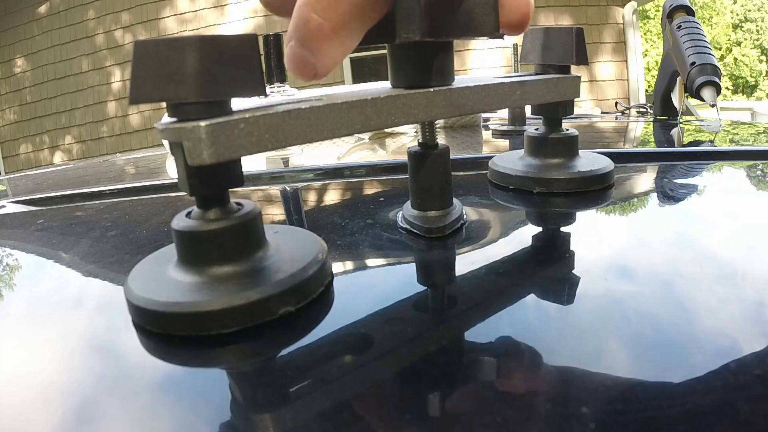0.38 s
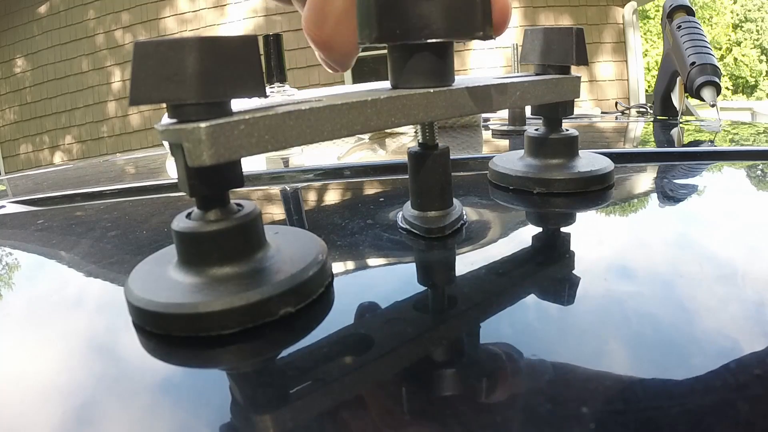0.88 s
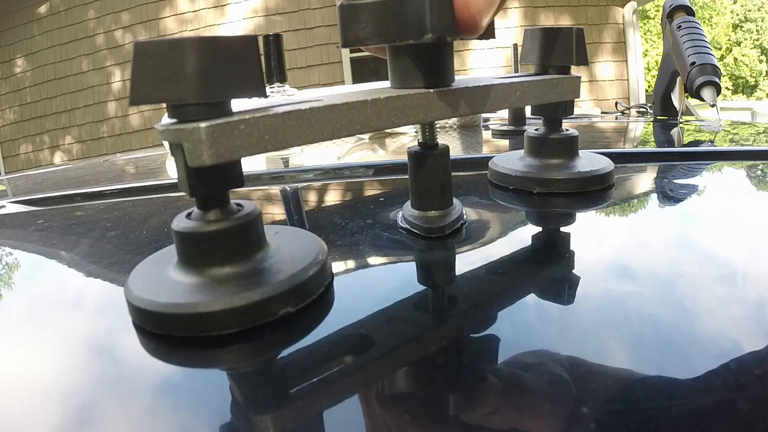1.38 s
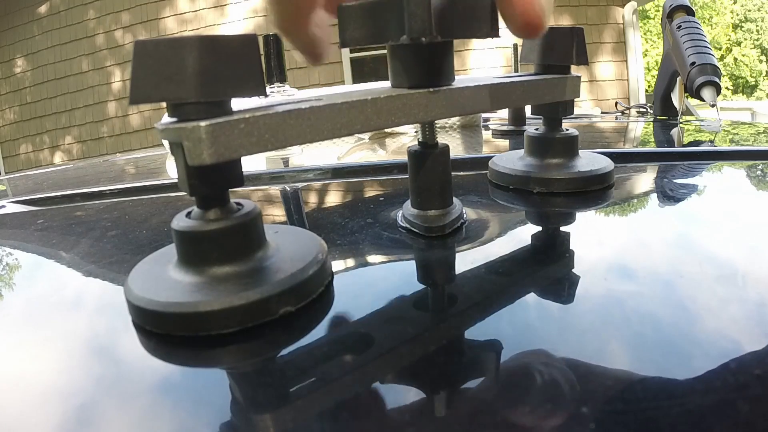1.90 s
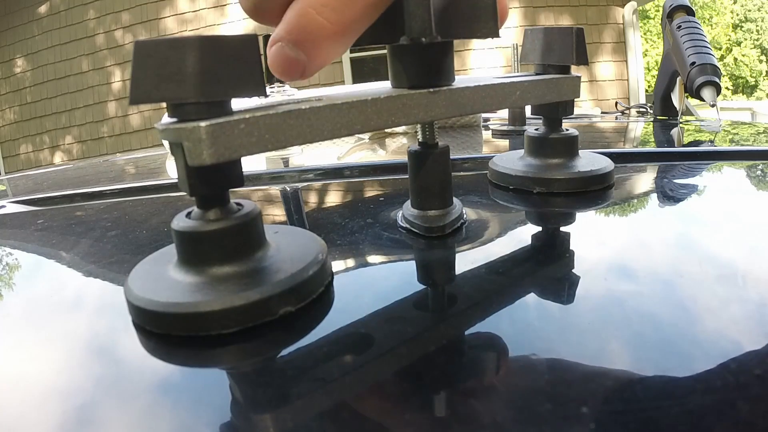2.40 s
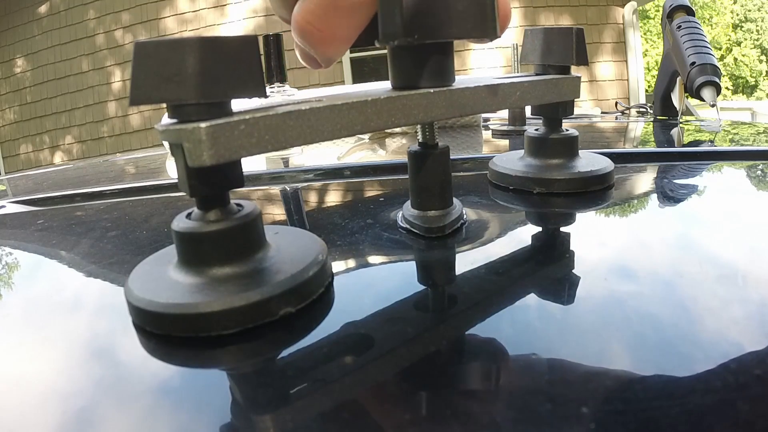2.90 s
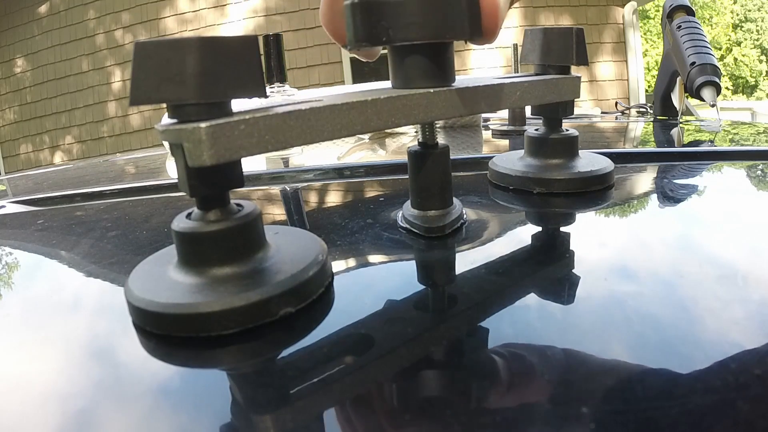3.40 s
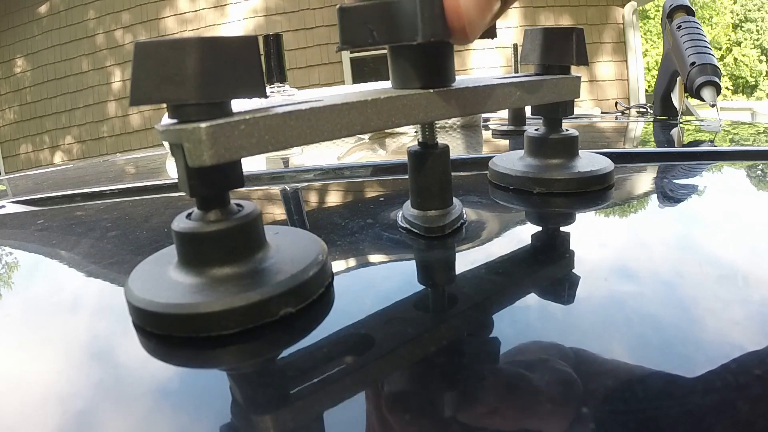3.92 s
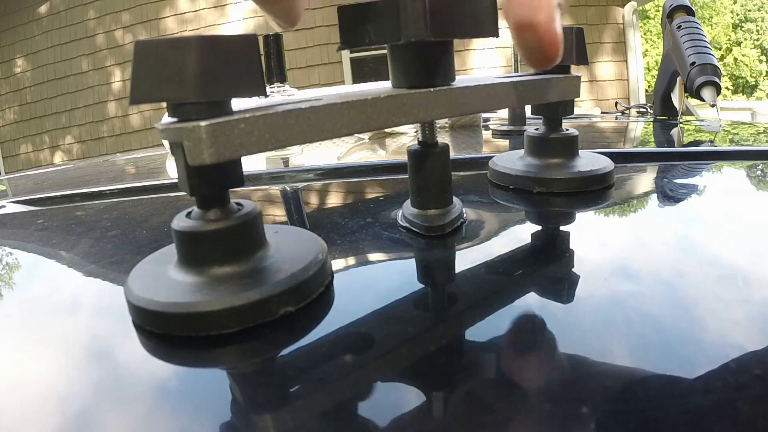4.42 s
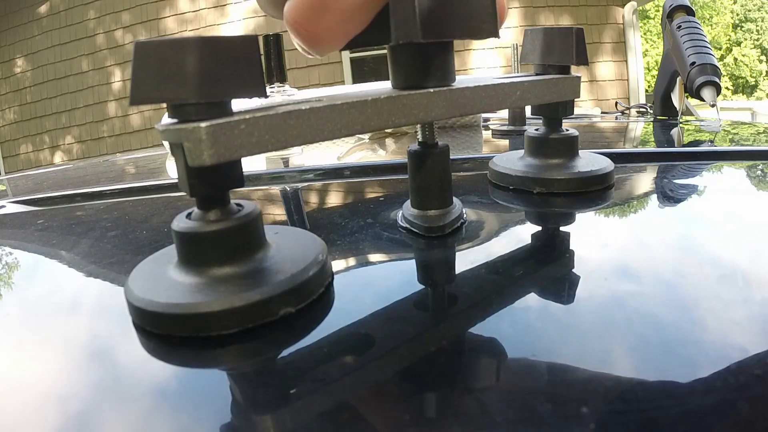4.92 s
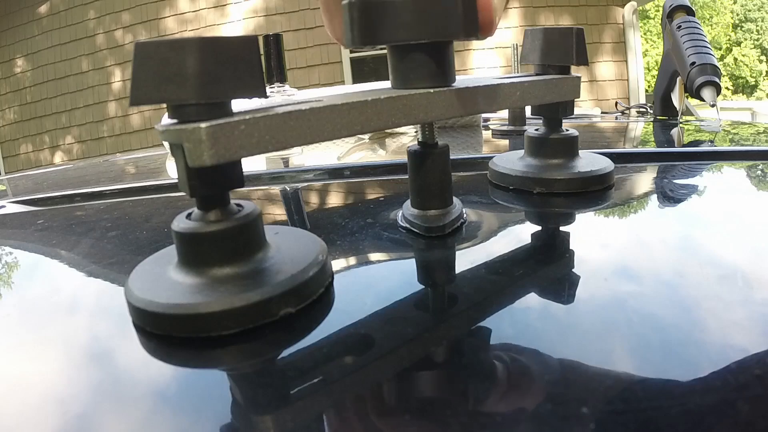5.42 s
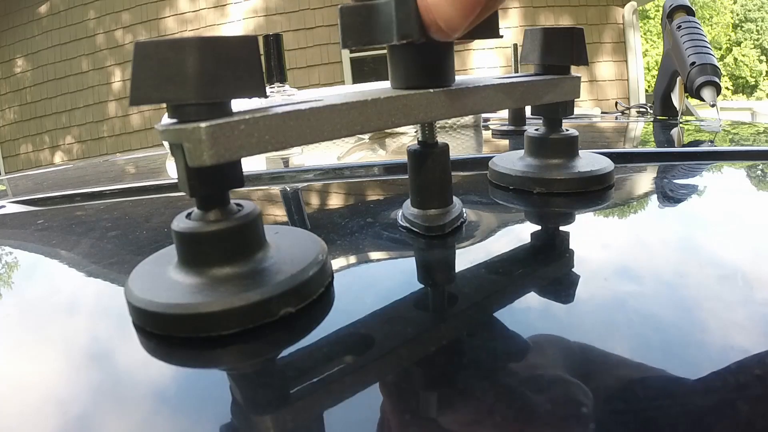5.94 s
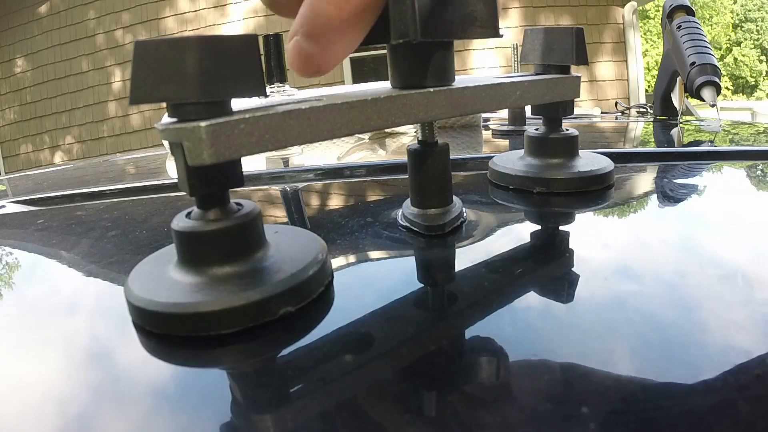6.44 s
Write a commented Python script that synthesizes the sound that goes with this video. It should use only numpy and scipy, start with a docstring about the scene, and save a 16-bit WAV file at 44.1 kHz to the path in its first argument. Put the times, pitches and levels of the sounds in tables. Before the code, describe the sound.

Three rising bird whistles open the scene, then another bird gives quick chips and a thin, squeaky wheeze. After a short lull the first bird returns with livelier warbles and slurs, and faint whistles come from farther away. Near the stereo microphone, a hand twisting a knob makes irregular light rubbing, clicks and soft hollow bumps on sheet metal. Steady traffic rumble and soft hiss lie underneath.

```python
"""A songbird carols from trees across a yard: gliding sines with soft ends and fluttering level. A second bird
answers with short falling chips and a thin wheeze; faint whistles sound far off. House walls and leaves smear
the notes into tails, made by convolution with decaying noise. Close by, fingers turn a plastic knob on a metal
panel: scuffs of friction noise, ringing ticks and thuds. Far traffic rumbles and drones and the microphone
hisses, all as coloured noise."""
import sys
import numpy as np
from scipy import signal
from scipy.fft import rfft, irfft
from scipy.io import wavfile
from scipy.ndimage import uniform_filter1d

SR = 44100
rng = np.random.default_rng(int(sys.argv[2]) if len(sys.argv) > 2 else 0)


def ratio_of_db(decibels):
    """Turn decibels (scalar or array-like) into linear amplitude factors; 0 dB maps to 1."""
    return 10 ** (np.asarray(decibels, float) / 20)


def output_pcm(signal):
    """Save a mono or channel-first signal as 16-bit PCM at the path in sys.argv[1].

    Samples are clipped to [-1, 1] before scaling.
    """
    pcm = np.clip(np.atleast_2d(signal).T, -1, 1) * 32767
    wavfile.write(sys.argv[1], SR, np.round(pcm).astype(np.int16))


N = 289296

# Loudness contour of a held note or far whistle: share_of_length, relative_db
HOLD_CONTOUR = [(0, -4.5), (.3, -0.5), (1, -8.5)]


def rms_one(x):
    """Normalization: a signal divided by its root mean square has unit power."""
    return x / np.sqrt(np.mean(x ** 2) + 1e-20)


def at_hz(points, hz):
    """Logarithmic frequency scale: a spectrum table is interpolated along log frequency."""
    columns = np.array(points)
    return np.interp(np.log(hz), np.log(columns[:, 0]), columns[:, 1])


def drift(rate_hz):
    """Low-pass filtered noise: two equal poles leave slow random motion with spread 1."""
    hop = 40    # samples between computed values
    pole = np.exp(-2 * np.pi * rate_hz * hop / SR)
    draws = rng.standard_normal(N // hop + 2002)
    slow = signal.lfilter([1], [1, -2 * pole, pole * pole], draws)[2000:]   # skip the build-up
    return np.interp(np.arange(N) / hop, np.arange(len(slow)), rms_one(slow))


def ring(clicks, hz, t60_s):
    """Damped resonance: a two-pole filter answers each unit click with a decaying sine of initial height 1."""
    radius = ratio_of_db(-60 / (t60_s * SR))
    angle = 2 * np.pi * hz / SR
    feedback = [1, -2 * radius * np.cos(angle), radius * radius]
    return signal.lfilter([0, np.sin(angle)], feedback, clicks + 1e-18)


def pan(x, left_db):
    """Interaural level difference: left minus right level places a sound."""
    return x * ratio_of_db(np.array([[left_db / 2], [-left_db / 2]]))


def stereo_noise(spectrum, flicker_db):
    """Spatial coherence: coloured noise is alike in the bass and unrelated in the treble."""
    # Left-right correlation: frequency_hz, correlation (0-1)
    likeness = [(100, .99), (300, .98), (700, 0.92), (1400, 0.78), (3000, 0.22), (6000, 0.17), (12000, 0)]
    # Left minus right level: frequency_hz, difference_db
    balance = [(100, -3), (700, -2.0), (1400, -1.5), (4000, 0.6), (10000, 1.3)]
    hz = np.maximum(np.fft.rfftfreq(N, 1 / SR), 1)
    mid, side = rfft(rng.standard_normal((2, N))) * ratio_of_db(at_hz(spectrum, hz))
    alike = np.clip(at_hz(likeness, hz), 0, 1)
    lean = ratio_of_db(at_hz(balance, hz) / 2)
    mid = np.sqrt(1 + alike) * mid
    side = np.sqrt(1 - alike) * side
    out = irfft(np.array([(mid + side) * lean, (mid - side) / lean]), N)
    steady = out / np.std(out.mean(axis=0))     # mid rms 1
    return steady * ratio_of_db(flicker_db * drift(8.3))


def background():
    """Superposition of independent noises: traffic rumble and drone add to a hiss without swells."""
    # Traffic swells: time_s, rumble_db, drone_db
    traffic = [(0.0, -35.5, -45), (1.5, -37, -46), (2.229, -36.5, -44.5), (2.6, -37, -45.5),
               (3.9, -39, -45.5), (4.3, -36.5, -46.5), (6.16, -37, -45.5), (6.3, -35.5, -43.5),
               (6.56, -33.5, -43)]
    # Spectral shapes, scaled to unit power in use: frequency_hz, relative_db_per_hz
    rumble_colour = [(11, -43), (18, -0.5), (64, 1), (209, -9), (285, -16.5), (361, -11.5), (400, -17),
                     (520, -44.5), (880, -120)]
    drone_colour = [(120, -24), (200, -1), (286, -5.5), (363, -4), (524, -11), (857, -15.5), (2000, -28),
                    (2600, -42), (4400, -120)]
    hiss_colour = [(880, -9), (1500, -13), (1870, -21.5), (2230, -5), (2320, -7), (3190, -6.5), (3650, -8),
                   (15100, -14)]
    time_s, rumble_db, drone_db = np.transpose(traffic)
    t = np.arange(N) / SR
    rumble = ratio_of_db(np.interp(t, time_s, rumble_db)) * stereo_noise(rumble_colour, flicker_db=1.23)
    drone = ratio_of_db(np.interp(t, time_s, drone_db)) * stereo_noise(drone_colour, flicker_db=0.88)
    hiss = ratio_of_db(-58.5) * stereo_noise(hiss_colour, flicker_db=0.94)
    return rumble + drone + hiss


def scuffs():
    """Friction: bursts of dense grains from sliding fingertips excite resonances of skin and plastic."""
    # Fingertip slides on the knob: centre_s, length_s, level_db (at the centre)
    slides = [(0.273, 0.025, -53.5), (.46, .022, -55), (0.574, .02, -61), (0.647, 0.064, -59.5),
              (1.354, 0.1, -66), (1.902, 0.073, -63), (2.042, 0.027, -57), (2.12, .02, -61),
              (2.175, 0.041, -56.5), (2.209, 0.013, -53), (2.273, 0.07, -58), (2.346, 0.026, -49),
              (4.304, 0.3, -58.5), (4.416, 0.032, -67), (4.602, 0.018, -61), (4.696, 0.051, -61.5),
              (5.77, .08, -65), (6.377, 0.02, -55), (6.46, 0.066, -61), (6.525, .04, -53)]
    # Scuff resonances: frequency_hz, width_hz, relative_db
    resonances = [(5800, 1800, -7.5), (7340, 1100, -0.5), (12600, 1400, -18), (1430, 440, 3)]
    t = np.arange(N) / SR
    pressure = np.zeros(N)
    for centre_s, length_s, level_db in slides:
        pressure += ratio_of_db(level_db) * np.exp(-0.5 * ((t - centre_s) / (length_s / 2)) ** 2)
    grains = rng.standard_normal(N) * ratio_of_db(3.3 * rng.exponential(1, N))
    colour = np.zeros(N)
    for hz, width_hz, relative_db in resonances:
        colour += ratio_of_db(relative_db) * signal.lfilter(*signal.iirpeak(hz, hz / width_hz, SR), grains)
    return pressure * rms_one(colour)


def knocks():
    """Modal impact: each blow rings a bright tick in the knob, then a dull thud in the panel."""
    # Blows on the knob, as drive to the modes: time_s, tick_db, thud_db
    blows = [(.205, -40.5, -35), (.442, -60, -40), (.909, -59, -21), (1.333, -53.5, -52),
             (1.829, -37.5, -19), (2.213, -37.5, -25.5), (2.243, -54, -21), (2.266, -45, -21.5),
             (4.321, -40, -20), (6.245, -47, -52), (6.372, -48, -25)]
    # Modes of the knob and of the panel: frequency_hz, relative_db, t60_s
    knob_modes = [(1530, 3.5, 0.014), (2700, 0, 0.0058), (5200, -4, 0.029), (7500, 0, 0.014),
                  (11000, -12, .006)]
    panel_modes = [(59, -4.5, 0.15), (106.6, 2, 0.076), (193.4, -2, 0.091), (359, -3, 0.098),
                   (703, -19.5, 0.055)]
    time_s, tick_db, thud_db = np.transpose(blows)
    out = np.zeros(N)
    for modes, drive_db, lag_s in ((knob_modes, tick_db, 0), (panel_modes, thud_db, 0.002)):
        spread_db = rng.normal(0, 0.82, (len(time_s), len(modes)))      # each blow favours other modes
        for k, (hz, relative_db, t60_s) in enumerate(modes):
            clicks = np.zeros(N)
            onsets = np.round((time_s + lag_s) * SR).astype(int)
            clicks[onsets] = ratio_of_db(drive_db + relative_db - 6 + spread_db[:, k])
            out += ring(clicks, hz, t60_s)
    return out


def whistle(notes, edge_s, waver, flutter_db):
    """Frequency modulation: each note is a soft-ended gliding sine whose level flutters quickly."""
    out = np.zeros(N)
    wobble = 1 + waver * drift(48)
    for note in notes:
        time_s, pitch_hz, level_db = np.transpose(note)
        i = np.arange(round((time_s[0] - edge_s) * SR), round((time_s[-1] + edge_s) * SR))
        ends = np.clip(np.minimum(i - i[0], i[-1] - i) / (2 * edge_s * SR), 0, 1)
        pitch = uniform_filter1d(np.interp(i / SR, time_s, pitch_hz), size=300) * wobble[i]
        level = np.sqrt(2) * ratio_of_db(np.interp(i / SR, time_s, level_db))   # table levels are rms
        phase = 2 * np.pi * np.cumsum(pitch) / SR
        out[i] += level * np.sin(np.pi / 2 * ends) ** 2 * np.sin(phase)
    return out * ratio_of_db(flutter_db * drift(69))


def yard(x, direct_db, wet_db, t60_s, late_db, late_t60_s, alike):
    """Reverberation: direct sound plus a quick decay from near walls and a slow one from far trees."""
    t = np.arange(round(1.5 * SR)) / SR
    decay = ratio_of_db(-60 * t / t60_s) + ratio_of_db(late_db - 60 * t / late_t60_s)
    decay = rms_one(decay) / np.sqrt(len(t))    # unit energy
    mid, side = rng.standard_normal((2, len(t))) * decay
    alike = np.clip(alike, 0, 1)
    echoes = np.sqrt((1 + alike) / 2) * mid + np.sqrt((1 - alike) / 2) * side * [[1], [-1]]
    # leaves and walls return little below 2240 Hz
    echoes = signal.sosfilt(signal.butter(4, 2240, "high", fs=SR, output="sos"), echoes)
    tail = signal.fftconvolve(x[None], echoes, axes=1)[:, :N]
    return ratio_of_db(direct_db) * x + ratio_of_db(wet_db) * tail


def glide(start_s, length_s, from_hz, to_hz, level_db, contour, ease_s=np.inf):
    """Pitch glide: rows (time_s, pitch_hz, level_db) go straight, or ease exponentially toward the goal."""
    share = np.linspace(0, 1, num=9)
    way = share if np.isinf(ease_s) else 1 - np.exp(-share * length_s / ease_s)
    pitch_hz = from_hz + (to_hz - from_hz) * way
    contoured_db = level_db + np.interp(share, *np.transpose(contour))
    return np.transpose([start_s + share * length_s, pitch_hz, contoured_db])


def far_bird():
    """Direct-to-reverberant ratio: faint whistles sound far off because echoes outweigh their direct sound."""
    # Faint whistles, levels at the source: start_s, length_s, from_hz, to_hz, level_db
    far_whistles = [(4.7, .1, 4800, 4860, -69), (4.85, .1, 4780, 4940, -66.5),
                    (4.99, 0.116, 4500, 4600, -67.5)]
    notes = [glide(*row, HOLD_CONTOUR) for row in far_whistles]
    song = whistle(notes, edge_s=0.0102, waver=0.015, flutter_db=3.5)
    return yard(song, direct_db=-2, wet_db=4.5, t60_s=0.57, late_db=-10, late_t60_s=1.2, alike=0.6)


def wheeze():
    """Harmonic series: multiples of a quavering fundamental open the wheeze, then fading lines follow."""
    # Quaver: time_s, fundamental_hz
    quaver = [(2.53, 1650), (2.55, 1816), (2.58, 1440), (2.61, 1410)]
    # Tones heard of the quaver, levels at the source: multiple_of_fundamental, level_db
    quaver_tones = [(2, -67), (3, -70), (4, -75)]
    # Thin lines, mostly creeping upward, levels at the source: start_s, length_s, from_hz, to_hz, level_db
    lines = [(2.582, 0.024, 4840, 4720, -62), (2.607, .023, 4720, 5930, -58),
             (2.628, 0.036, 5930, 6200, -61), (2.624, 0.15, 2930, 3460, -61.5),
             (2.63, 0.13, 6340, 7200, -63.5), (2.632, 0.078, 3850, 3980, -66),
             (2.628, .17, 5120, 5300, -67), (2.773, 0.1, 3850, 4240, -63)]
    fade_db_per_s = 45
    notes = [[(time_s, k * hz, level_db) for time_s, hz in quaver] for k, level_db in quaver_tones]
    for row in lines:
        notes.append(glide(*row, [(0, 0), (1, -fade_db_per_s * row[1])]))
    song = whistle(notes, edge_s=0.0035, waver=0.0054, flutter_db=3.0)
    return yard(song, direct_db=2.5, wet_db=1.5, t60_s=0.56, late_db=-15, late_t60_s=0.9, alike=0.6)


def chip_notes():
    """Rapid frequency sweeps: the second bird's arches, knees with an upper voice, and straight drops."""
    # Arched chips: top_s, length_s, top_hz, level_db
    arches = [(1.935, .048, 4940, -43.5), (1.932, 0.0264, 3770, -50.5), (4.245, .045, 4870, -42.5),
              (6.18, 0.042, 4660, -47.5), (6.18, 0.028, 3630, -51)]
    # Shape of an arch: share_of_length (from the top), pitch_ratio, relative_db
    arch_shape = [(-.47, .9, -15), (-.1, .99, -2), (.08, 1.0, 0), (.28, .92, -1), (.52, .81, -7)]
    # Chips that sag to a knee and drop: knee_s, lead_in_s, knee_hz, level_db, upper_voice_db
    knees = [(2.066, 0.031, 3970, -45.5, -56), (2.178, 0.037, 3860, -49, -56),
             (4.38, 0.031, 4020, -51.5, -57), (4.497, 0.0091, 3810, -51.5, -59),
             (6.335, 0.018, 3780, -55, -65.5), (6.457, .017, 3770, -54.5, -72)]
    # Upper voice piping above a knee: time_s (from the knee), pitch_hz
    pipe = [(-.004, 5250), (.012, 4750)]
    # Straight falling chips: start_s, length_s, from_hz, to_hz, level_db
    drops = [(1.15, .04, 4750, 3700, -42.5), (1.254, 0.03, 4510, 3260, -43.5),
             (4.246, 0.021, 3170, 2720, -51)]
    # Loudness contour of a drop: share_of_length, relative_db
    drop_contour = [(0, -6), (.35, 0), (1, -12)]
    sag_hz_per_s, rise_db_per_s = 13000, 300            # lead-in to the knee
    drop_s, drop_ratio, drop_db = 0.0181, 0.84, -3      # from the knee to the end
    notes = []
    for top_s, length_s, hz, level_db in arches:
        notes.append([(top_s + share * length_s, hz * ratio, level_db + relative_db)
                      for share, ratio, relative_db in arch_shape])
    for knee_s, lead_s, hz, level_db, upper_db in knees:
        notes.append([(knee_s - lead_s, hz + sag_hz_per_s * lead_s, level_db - rise_db_per_s * lead_s),
                      (knee_s - lead_s / 2, hz + sag_hz_per_s * lead_s / 4, level_db),
                      (knee_s, hz, level_db),
                      (knee_s + drop_s, hz * drop_ratio, level_db + drop_db)])
        notes.append([(knee_s + after_s, pipe_hz, upper_db) for after_s, pipe_hz in pipe])
    return notes + [glide(*row, drop_contour) for row in drops]


def chips():
    """Early and late reflections: the second bird's short chips are louder direct than in their echoes."""
    song = whistle(chip_notes(), edge_s=0.003, waver=0.003, flutter_db=1.5)
    return yard(song, direct_db=1.0, wet_db=-3.5, t60_s=0.54, late_db=-9, late_t60_s=1.6, alike=0.66)


def carol_notes():
    """Pitch contours of the first bird's song: eased slurs and falls, held notes, and warbles."""
    # Slurs: start_s, length_s, from_hz, to_hz (pitch aimed at), level_db, ease_s (time constant)
    slurs = [(.09, 0.23, 2327, 2804, -50.5, 0.054), (.475, .225, 2398, 3176, -44, 0.049),
             (.872, 0.2, 2404, 3178, -44.5, .05), (4.645, 0.14, 3396, 3098, -45.5, .022),
             (5.14, 0.15, 2898, 2797, -47.5, 0.0295), (5.475, 0.21, 2280, 3163, -43.5, .04),
             (5.865, 0.22, 2296, 3190, -43, 0.041)]
    # Falling slides that ease down: start_s, length_s, from_hz, to_hz (pitch aimed at), level_db
    falls = [(3.615, 0.077, 2746, 2294, -51.5), (4.027, 0.058, 3200, 2180, -47.5),
             (4.145, 0.11, 2500, 2077, -47), (4.592, 0.044, 2620, 2160, -51), (5.15, .07, 2610, 2230, -46)]
    # Held notes: start_s, length_s, pitch_hz, level_db
    holds = [(0.281, .15, 2290, -53.5), (0.702, 0.14, 2285, -52.5), (3.695, 0.098, 2620, -52),
             (4.52, 0.068, 2650, -54), (4.535, 0.068, 3520, -47.5), (4.632, 0.11, 2586, -53.5),
             (4.76, 0.34, 2528, -58.5), (5.054, 0.145, 2615, -44), (5.22, 0.041, 2373, -49),
             (5.326, 0.087, 2250, -51), (5.713, 0.1, 2280, -48.5)]
    # Warbles that turn in mid-note, one curve each: time_s, pitch_hz, level_db
    warbles = [
        [(3.46, 3237, -63), (3.51, 3390, -45), (3.545, 3540, -52), (3.56, 3040, -49), (3.58, 2860, -45),
         (3.6, 2960, -48), (3.62, 2800, -47), (3.65, 2740, -52.5)],
        [(3.985, 2386, -70), (4.0, 3480, -60), (4.008, 3390, -46), (4.025, 3220, -44)],
        [(4.055, 3200, -39), (4.07, 2570, -46), (4.09, 2220, -47), (4.105, 2350, -48), (4.12, 2794, -39),
         (4.14, 2782, -49.5), (4.17, 2510, -52)],
        [(4.578, 2835, -54), (4.605, 2960, -50), (4.62, 2700, -52), (4.635, 2573, -45)],
    ]
    # Loudness contours: share_of_length, relative_db
    slur_contour = [(0, -4), (.25, 0.5), (.6, -1.5), (1, -8)]
    fall_contour = [(0, -1), (.5, -3), (1, -3.5)]
    fall_ease_share = 0.3       # pitch time constant as a share of length
    notes = [glide(*row, slur_contour, ease_s) for *row, ease_s in slurs]
    notes += [glide(*row, fall_contour, fall_ease_share * row[1]) for row in falls]
    notes += [glide(start_s, length_s, hz, hz, level_db, HOLD_CONTOUR)
              for start_s, length_s, hz, level_db in holds]
    return notes + warbles


def carol():
    """Source directivity: the bird turns on its perch, so more or less of its song comes straight."""
    # Facing of the bird: time_s, direct_sound_db
    facing = [(0, -7.5), (1.2, -2), (3.4, 1.5), (4.4, 0.5), (5.1, 0.5), (5.5, -0.5), (6.2, -3.5)]
    direct_db = np.interp(np.arange(N) / SR, *np.transpose(facing))
    song = whistle(carol_notes(), edge_s=0.006, waver=0.0071, flutter_db=3.5)
    return yard(song, direct_db, wet_db=2, t60_s=0.42, late_db=-4.5, late_t60_s=1.82, alike=0.95)


def scene():
    """Linear superposition: birds in the yard, hand at the knob and background add as pressures."""
    hand = pan(scuffs(), left_db=3.0) + pan(knocks(), left_db=-2.5)
    second_bird = pan(chips(), left_db=-1.5) + pan(wheeze(), left_db=-0.5)
    first_bird = pan(carol(), left_db=-1.9)
    return background() + hand + far_bird() + second_bird + first_bird


def band_limit(x):
    """A steep low-pass at the top of the band."""
    return signal.sosfilt(signal.butter(12, 15240, fs=SR, output="sos"), x)


def record(dry):
    """Two-channel capture: the finished left and right mix becomes the stored sound."""
    return band_limit(dry)


dry = scene()
out = record(dry)
output_pcm(out)
```